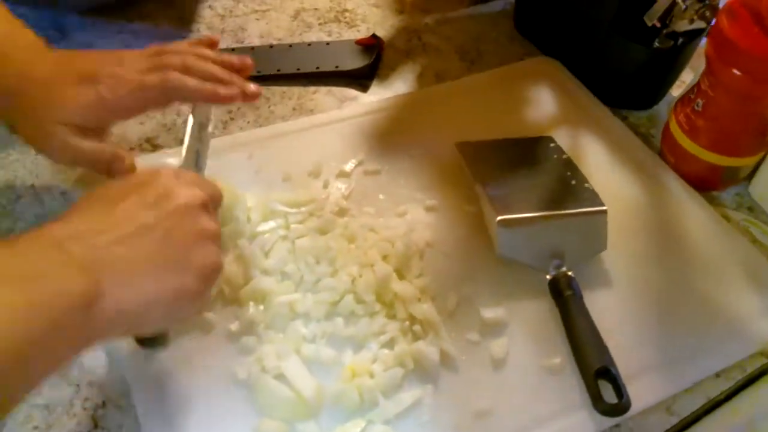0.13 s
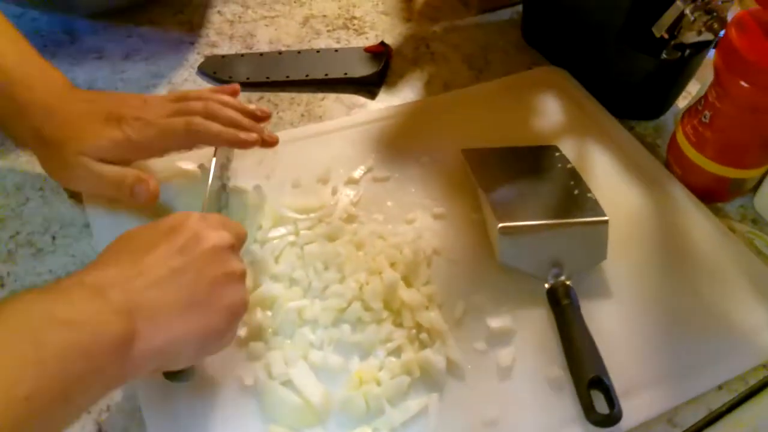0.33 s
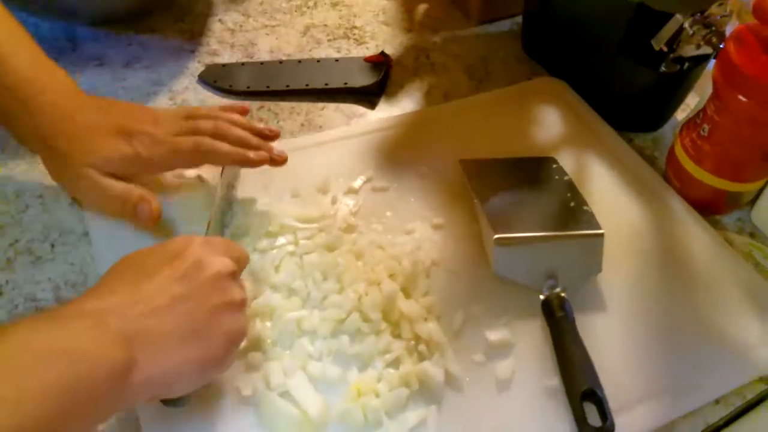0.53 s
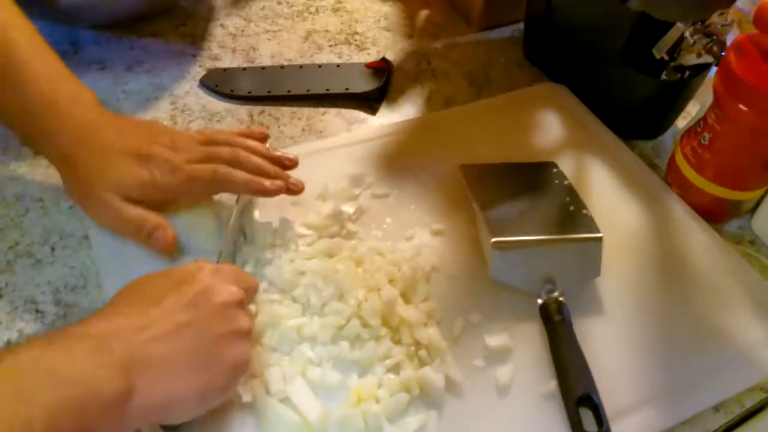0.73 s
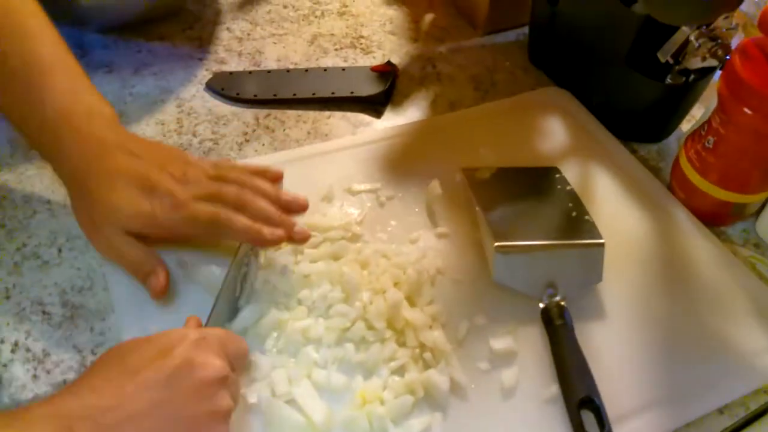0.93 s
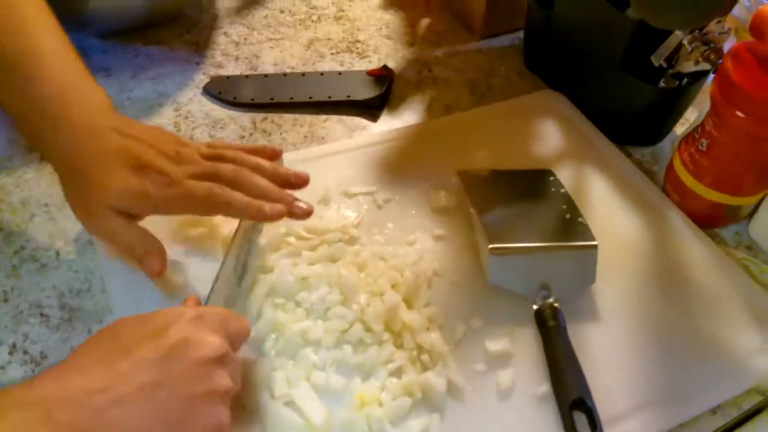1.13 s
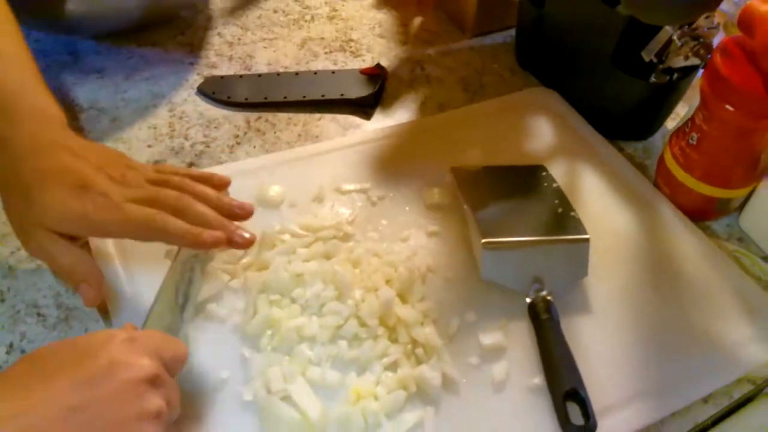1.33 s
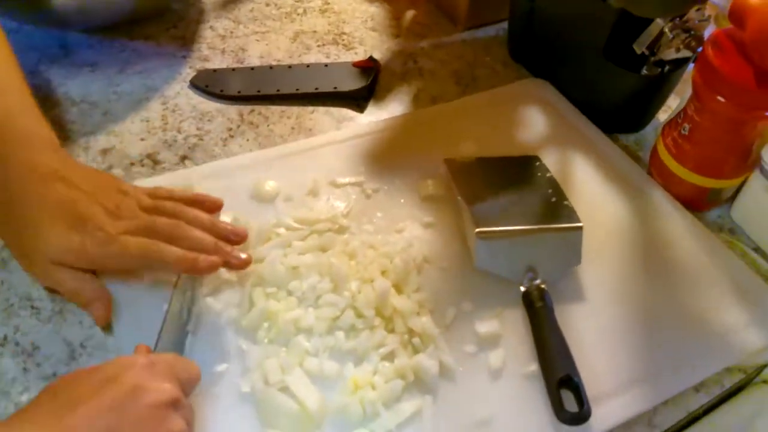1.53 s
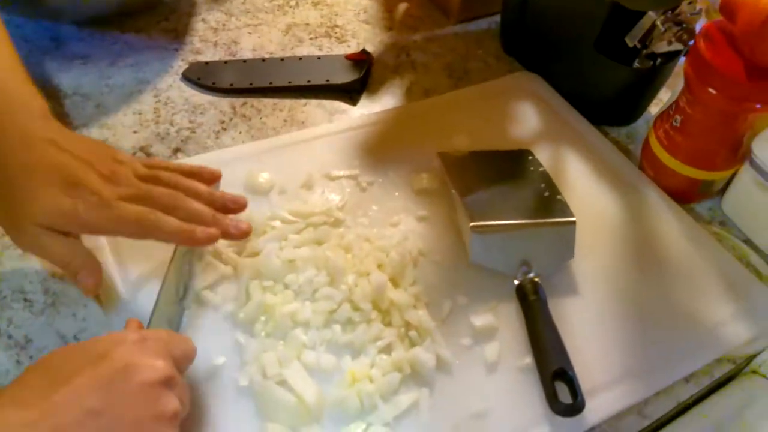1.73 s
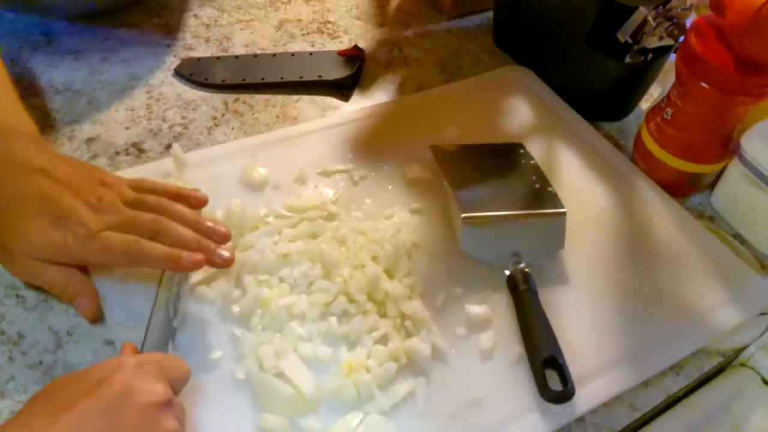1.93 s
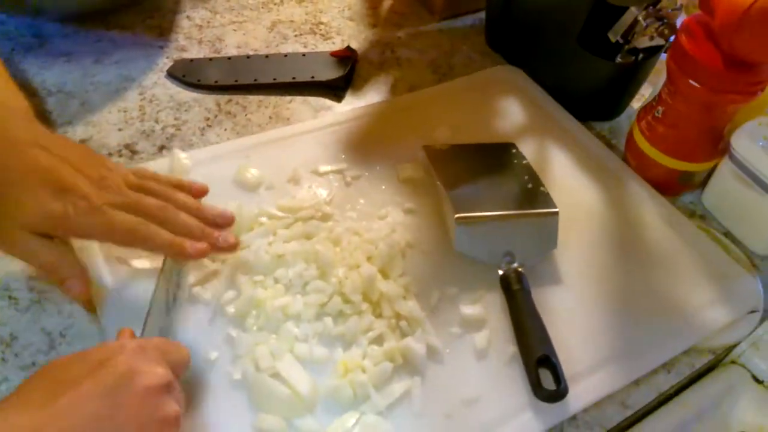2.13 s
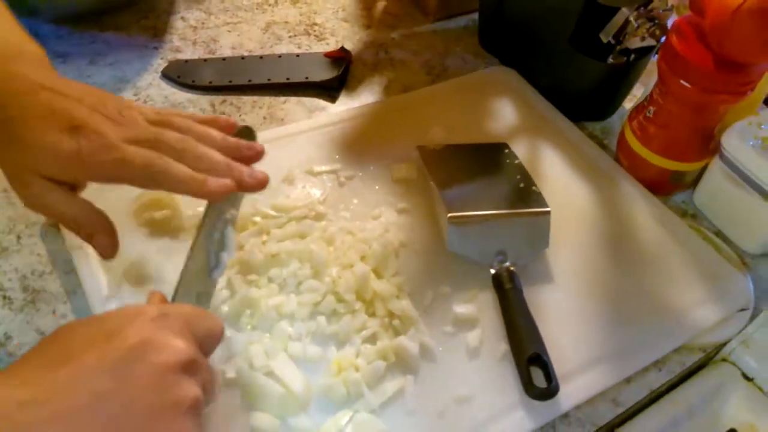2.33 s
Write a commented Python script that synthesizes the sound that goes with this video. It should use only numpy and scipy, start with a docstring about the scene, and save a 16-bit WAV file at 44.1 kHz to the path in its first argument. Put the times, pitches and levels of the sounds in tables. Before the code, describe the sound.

Rapid hard knife knocks rattle a plastic cutting board, then slow to a few separate chops

```python
"""Sharp knocks, rattles and brief crunches: a chef's knife rocks through diced onion in a home kitchen.
The edge sprays tiny clicks from the onion and knocks the modes of a plastic board lying loose on a stone
counter; the board chatters in dense uneven taps, and a steel scraper lying on it rings when jolted.
The room answers with decaying noise over a faint kitchen tone. The close microphone overloads on the
hardest knocks."""
import sys
import numpy as np
from scipy import signal
from scipy.fft import rfft, irfft
from scipy.io import wavfile

SR = 44100
rng = np.random.default_rng(int(sys.argv[2]) if len(sys.argv) > 2 else 0)


def put_to_file(sound):
    """Save the sound as 16-bit audio at rate SR, in the file named by the first command-line argument."""
    columns = np.atleast_2d(sound).T  # one column per channel
    safe = np.clip(columns, -1, 1)
    whole_steps = np.round(safe * 32767)
    wavfile.write(sys.argv[1], SR, whole_steps.astype(np.int16))


N = 110250  # 2.5 s

MODE_SPREAD_DB = 4  # standard deviation of each mode's strength from strike to strike


def from_db(db):
    """Decibels to amplitude gain."""
    return 10 ** (np.asarray(db) / 20)


def rms_one(x):
    """Scale to unit rms."""
    return x / np.sqrt(np.mean(x ** 2) + 1e-20)


def at_hz(points, hz, column=1):
    """Read a table column by interpolating on a log-frequency axis."""
    points = np.array(points)
    return np.interp(np.log(hz), np.log(points[:, 0]), points[:, column])


def band(x, low_hz, high_hz, order=2):
    """Butterworth band-pass."""
    edges = [low_hz, min(high_hz, 0.45 * SR)]
    return signal.sosfilt(signal.butter(order, edges, "band", fs=SR, output="sos"), x)


def ring(clicks, hz, t60):
    """A two-pole resonator: a unit click starts a decaying sine of height 1."""
    radius = from_db(-60 / (t60 * SR))
    angle = 2 * np.pi * hz / SR
    feedback = [1, -2 * radius * np.cos(angle), radius ** 2]
    return signal.lfilter([0, np.sin(angle)], feedback, clicks + 1e-18)


def grains(per_s, spread_db):
    """Randomly timed clicks of uneven size and random sign, at unit rms."""
    size_db = spread_db * np.minimum(rng.exponential(1, N), 4)
    sizes = from_db(size_db) * rng.choice([-1, 1], N)
    return rms_one(sizes * (rng.random(N) < per_s / SR))


def spell(start_s, length_s, level_db, rise_s, fall_s):
    """Envelope: linear rise from the start, exponential fall once the length has passed."""
    t = np.arange(N) / SR - start_s
    rise = np.clip(t / rise_s, 0, 1)
    fall = np.exp(-np.maximum(t - length_s, 0) / fall_s)
    return from_db(level_db) * rise * fall


# The edge knocks on the board; levels are relative, crack and thump to their own knock:
# start_s, level_db, crack_db, thump_db, hardness_db_per_octave
KNOCKS = [(.233, 8, -30.5, -29, 6), (0.275, -2, -19.5, -9, 5.5), (.344, 21, -22, -18, 0),
          (.379, -4.5, -26, -6, 1), (.397, -0.5, -42, -8, 0.5), (.486, 17, -19, -6.5, 3.5),
          (0.583, 14, -12, -14, -0.5), (0.623, 4.5, -8.5, -10, 3), (0.64, 18.5, -25.5, -27, 0),
          (.723, 5.5, -29, -3, 2.5), (0.804, 16, -9.5, -11, 0.5), (0.838, 1.5, -21, -9, 5.5),
          (0.853, -1, -16.5, -2.5, -1.5), (1.004, 9, -31, -2.5, 4.5), (1.028, -5.5, -31, 12, 10.5),
          (1.086, 11, -11.5, -20, 2.5), (1.117, -9.5, -10, -16, 11), (1.141, 9.5, -29.5, -26, -2.5),
          (1.534, 5, -27.5, -25, 1.5), (1.582, -18, -20, -8, -6.5), (1.632, -3.5, -47.5, -4.5, -2.5),
          (1.892, 13.5, -21.5, -18, 3), (1.941, -8, -11, -19, 3.5), (1.947, -1, -15, -32, 2),
          (2.104, 1.5, -34, -7, 0), (2.165, -7, -54.5, -15, -4)]
# Modes of the plastic board: pitch_hz, level_db, t60_s
BOARD_MODES = [(306.3, -15, 0.047), (455.3, -10.5, 0.049), (586.4, -10.5, 0.026), (721.3, -3, 0.027),
               (850, -3, 0.023), (966, -7.5, 0.023), (1117.5, -3.5, 0.023), (1345, -1.5, 0.018),
               (1589, -4, 0.02), (1862, -3.5, 0.017), (2176, -9, 0.013), (2547, -15.5, 0.017),
               (3038, -13.5, .012), (4260, -17, 0.0049)]
# Low thump modes of the counter: pitch_hz, level_db, t60_s
COUNTER_MODES = [(42.2, -31.5, 0.027), (64, -16, 0.082), (107, -20, 0.16), (174.7, -18.5, 0.073)]
KNOCK_DB, CONTACT_HZ = -7, 5000  # trim on all modes; low-pass corner of the ringing
PIVOT_HZ = 820  # hardness tilts the board modes around this pitch
CRACK_DB, CRACK_T60_S, CRACK_LOW_HZ, CRACK_HIGH_HZ = 9.5, 0.017, 1800, 5850


def knocks():
    """Each knock strikes board and counter modes with varied strengths and adds a short bright crack."""
    start_s, level_db, crack_db, thump_db, hardness = np.transpose(KNOCKS)
    at = (start_s * SR).astype(int)
    modes = BOARD_MODES + COUNTER_MODES
    spread = rng.standard_normal((len(at), len(modes)))
    signs = np.sign(rng.random(spread.shape) - 0.5)
    body = 0
    for k, (hz, mode_db, t60) in enumerate(modes):
        on_counter = k >= len(BOARD_MODES)
        color_db = thump_db if on_counter else hardness * np.log2(hz / PIVOT_HZ)
        strike_db = level_db + KNOCK_DB + mode_db + MODE_SPREAD_DB * spread[:, k] + color_db
        clicks = np.zeros(N)
        clicks[at] = from_db(strike_db) * signs[:, k]
        body = body + ring(clicks, hz, t60)

    kicks = np.zeros(N)
    kicks[at] = from_db(level_db + crack_db + CRACK_DB)
    fading = signal.lfilter([1], [1, -from_db(-60 / (CRACK_T60_S * SR))], kicks)
    crack = fading * rms_one(band(rng.standard_normal(N), CRACK_LOW_HZ, CRACK_HIGH_HZ))
    softened = signal.sosfilt(signal.butter(1, CONTACT_HZ, fs=SR, output="sos"), body)
    return softened + crack


# The board chatters on the counter; grit is relative to its own chatter:
# start_s, length_s, level_db, grit_db, favoured_pitch_hz
CHATTERS = [(0.229, 0.021, -3.5, -17.5, 971), (0.264, 0.0065, -1.5, -19.5, 744),
            (0.303, 0.032, -9, -18.5, 800), (0.342, 0.0086, -4.5, -14.5, 810),
            (0.377, 0.019, -15, -15.5, 1000), (0.403, 0.028, -17.5, -34, 940),
            (0.441, 0.0043, -17.5, -21.5, 900), (0.482, 0.025, -3, -14, 1000),
            (.525, 0.039, -15.5, -20.5, 855), (0.587, 0.014, -5.5, -21, 776),
            (0.629, 0.017, 2.5, -16, 1138), (0.661, .024, -11.5, -13, 1100),
            (0.722, 0.0093, -1.5, -21.5, 991), (0.748, 0.044, -13, -29, 780), (0.811, 0.015, -6, -23, 805),
            (0.845, 0.043, -6, -15, 940), (1.002, 0.027, -8, -13, 1130), (1.021, 0.048, -13, -23, 756),
            (1.083, 0.013, -5, -17, 720), (1.121, 0.0073, -10.5, -16.5, 850),
            (1.145, 0.006, -3, -22.5, 670), (1.539, 0.0057, -10, -20.5, 1190),
            (1.548, 0.019, -17, -17.5, 950), (1.587, 0.015, -14.5, -26, 780),
            (1.887, 0.011, 6, -21.5, 1296), (1.902, 0.058, -12.5, -22.5, 900),
            (1.942, 0.032, -5.5, -17.5, 1030), (2.105, 0.0044, -15.5, -28, 845),
            (2.112, 0.0072, -20.5, -20.5, 700), (2.122, 0.049, -28.5, -27, 755),
            (2.165, 0.011, -26, -23.5, 620)]
CHATTER_RISE_S, CHATTER_FALL_S = 0.0013, 0.01
TAPS_PER_S, TAP_SPREAD_DB = 3000, 4.5
FAVOUR_DB_PER_OCTAVE = 7  # loss of a mode with distance from the favoured pitch
GRIT_PER_S, GRIT_SPREAD_DB, GRIT_LOW_HZ, GRIT_HIGH_HZ = 4000, 3.5, 1920, 6000


def chatter():
    """Dense uneven taps drive the board modes nearest the favoured pitch and grind with a gritty hiss."""
    shakes = np.array([spell(start_s, length_s, level_db, CHATTER_RISE_S, CHATTER_FALL_S)
                       for start_s, length_s, level_db, _, _ in CHATTERS])
    grit_db, favoured_hz = np.transpose(CHATTERS)[3:]
    taps = grains(TAPS_PER_S, TAP_SPREAD_DB)
    # loudness of the whole board under steady taps, used to level the rattle
    steady = sum(from_db(mode_db) * ring(taps, hz, t60) for hz, mode_db, t60 in BOARD_MODES).std()
    rattle = 0
    for k, (hz, mode_db, t60) in enumerate(BOARD_MODES):
        octaves_away = np.abs(np.log2(hz / favoured_hz))
        share = from_db(mode_db - FAVOUR_DB_PER_OCTAVE * octaves_away)
        shifted_taps = np.roll(taps, 997 * k)  # each mode gets the taps at another time
        rattle = rattle + ring(shifted_taps * (share @ shakes), hz, t60) / steady
    grit = rms_one(band(grains(GRIT_PER_S, GRIT_SPREAD_DB), GRIT_LOW_HZ, GRIT_HIGH_HZ))
    return rattle + (from_db(grit_db) @ shakes) * grit


# The edge crunches through onion: start_s, length_s, level_db
CRUNCHES = [(0.208, 0.017, -25), (0.466, 0.015, -42), (0.599, 0.0082, -44.5), (0.605, .015, -42),
            (0.702, 0.017, -29.5), (0.711, 0.014, -21), (0.797, 0.0042, -22), (0.986, 0.024, -25),
            (1.52, 0.0044, -15), (1.525, 0.024, -22.5), (1.889, 0.0071, 24)]
CRUNCH_RISE_S, CRUNCH_FALL_S = 0.013, 0.0013
GRAINS_PER_S, GRAIN_SPREAD_DB, CRUNCH_LOW_HZ, CRUNCH_HIGH_HZ = 9000, 2.5, 1490, 8300


def crunches():
    """Onion cells burst in a swelling spray of tiny clicks that stops abruptly."""
    swell = sum(spell(start_s, length_s, level_db, CRUNCH_RISE_S, CRUNCH_FALL_S)
                for start_s, length_s, level_db in CRUNCHES)
    bursts = grains(GRAINS_PER_S, GRAIN_SPREAD_DB)
    return swell * rms_one(band(bursts, CRUNCH_LOW_HZ, CRUNCH_HIGH_HZ, order=1))


# The steel scraper is jolted: start_s, level_db
JOLTS = [(0.277, -18.5), (0.316, -31.5), (0.389, -27), (.640, -22.5), (1.03, -25.5), (1.972, -22.5)]
# Modes of the scraper: pitch_hz, level_db, t60_s
SCRAPER_MODES = [(2990, 0, .13), (3450, -8, .1), (3890, -4, .12), (4500, -7, .12), (4725, -6, .13),
                 (5370, -10, .1), (6600, -14, .1), (7950, -12, .11), (8970, -12, .1), (10500, -14, .08)]


def scraper():
    """Each jolt strikes the steel's modes with strengths of its own."""
    start_s, level_db = np.transpose(JOLTS)
    at = (start_s * SR).astype(int)
    spread = rng.standard_normal((len(at), len(SCRAPER_MODES)))
    ringing = 0
    for k, (hz, mode_db, t60) in enumerate(SCRAPER_MODES):
        clicks = np.zeros(N)
        clicks[at] = from_db(level_db + mode_db + MODE_SPREAD_DB * spread[:, k])
        ringing = ringing + ring(clicks, hz, t60)
    return ringing


# Reverberation of the home kitchen, relative levels: pitch_hz, t60_s, level_db
KITCHEN = [(84.9, 0.43, -25), (170, .3, -19), (350, 0.54, -12), (690, 0.38, -17), (1670, 0.4, -16.5),
           (4440, 0.36, -11), (12000, .28, -52.5)]


def kitchen(close):
    """The room's response: octave bands of noise, each dying at its own rate."""
    t = np.arange(SR) / SR
    tail = 0
    for low_hz in 60 * 2.0 ** np.arange(8):
        centre_hz = low_hz * np.sqrt(2)
        onset = np.clip(t / 0.002, 0, 1)
        decay = from_db(-60 * t / at_hz(KITCHEN, centre_hz)) * onset
        piece = band(rng.standard_normal(SR), low_hz, 2 * low_hz) * decay
        gain = from_db(at_hz(KITCHEN, centre_hz, column=2))
        tail = tail + gain * piece / np.sqrt(np.sum(decay ** 2))
    return signal.fftconvolve(close, tail)[:N]


# Spectrum of kitchen air and microphone hiss, relative density: pitch_hz, level_db (per Hz)
ROOM_TONE = [(12, -34), (20, -17), (32, -15), (116, -16.5), (150, -18), (193, -19.5), (377, -16),
             (513, -25), (607, -22.5), (4060, -41.5), (16000, -48.5)]
ROOM_TONE_DB, TONE_WAVER_DB = -46.5, 1  # rms level, and the spread of its slow drift


def room_tone():
    """Kitchen air and microphone hiss: noise shaped in frequency, its level wavering a little."""
    hz = np.maximum(np.fft.rfftfreq(N, 1 / SR), 1)
    shape = from_db(at_hz(ROOM_TONE, hz)) * (hz > 15)
    air = irfft(rfft(rng.standard_normal(N)) * shape, N)
    waver = np.interp(np.arange(N), np.linspace(0, N, 40), rng.standard_normal(40))
    return from_db(ROOM_TONE_DB + TONE_WAVER_DB * waver) * rms_one(air)


def scene():
    """Knife, onion, board and scraper close by, with the kitchen around them."""
    close = knocks() + chatter() + crunches() + scraper()
    return (close + kitchen(close) + room_tone())[None]


OFFSET, CLIP_LEVEL, CUTOFF_HZ = 0.009, 0.94, 16300


def record(dry):
    """The microphone adds a small offset and flattens peaks in hard overload;
    a steep low-pass then leaves nothing audible above about 16 kHz."""
    flat = np.clip(dry + OFFSET, -CLIP_LEVEL, CLIP_LEVEL)
    # 70 dB down from the cutoff upward
    return signal.sosfilt(signal.cheby2(16, 70, CUTOFF_HZ, fs=SR, output="sos"), flat)


dry = scene()
out = record(dry)
put_to_file(out)
```